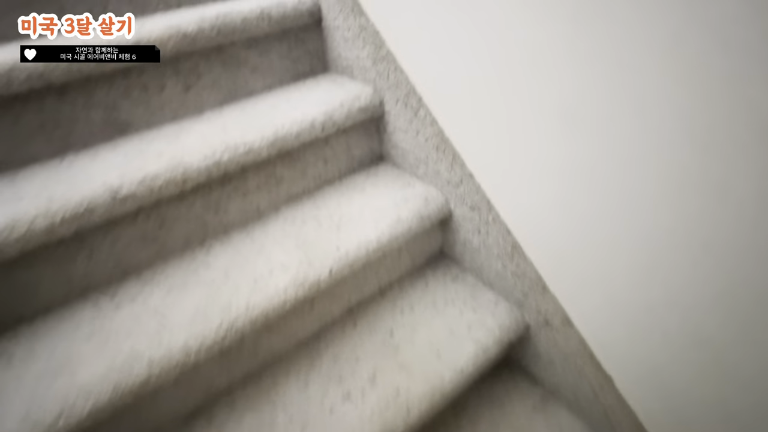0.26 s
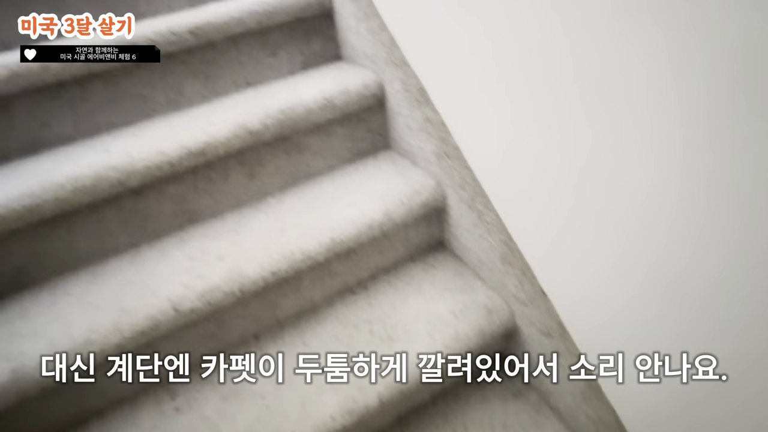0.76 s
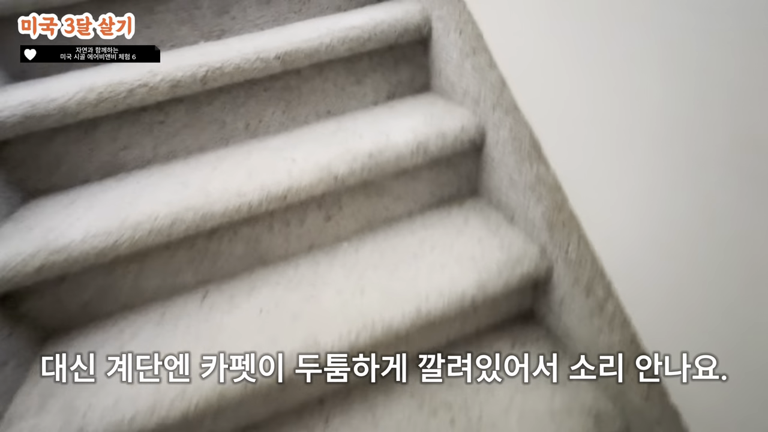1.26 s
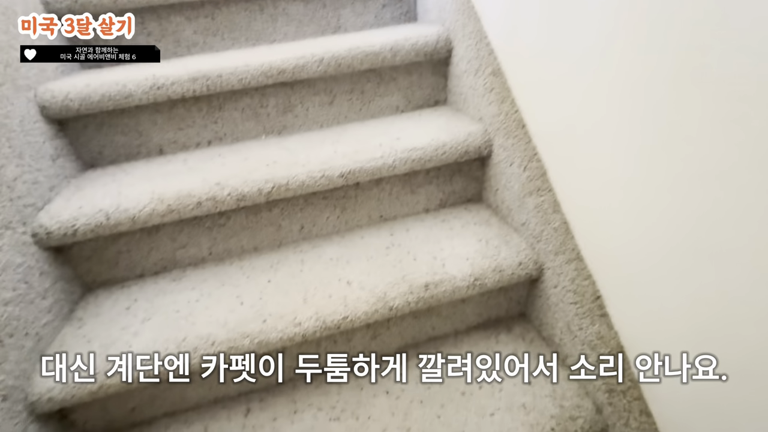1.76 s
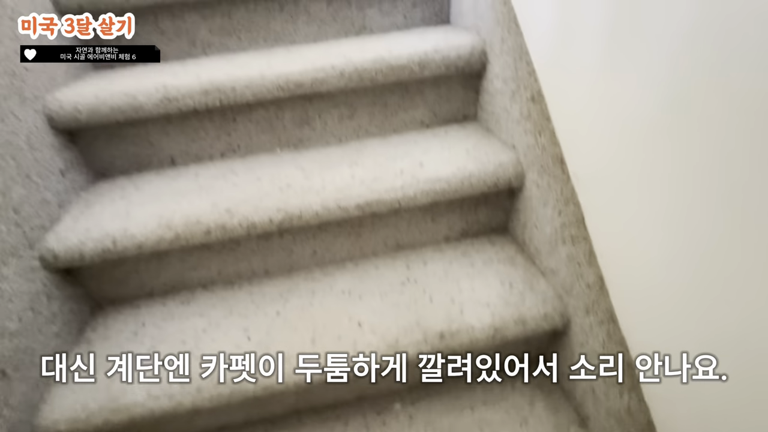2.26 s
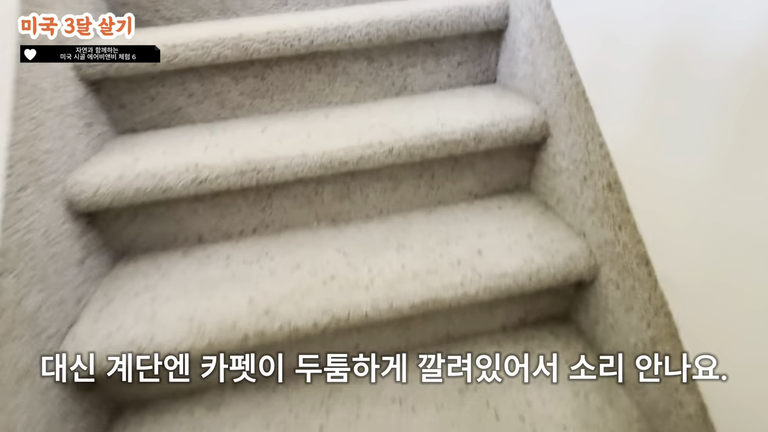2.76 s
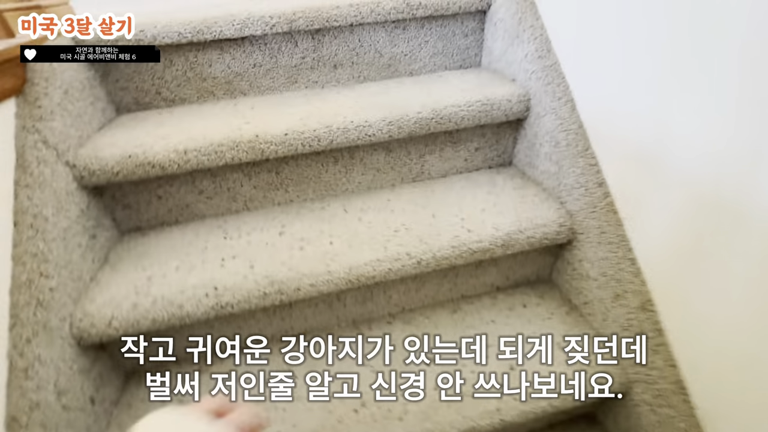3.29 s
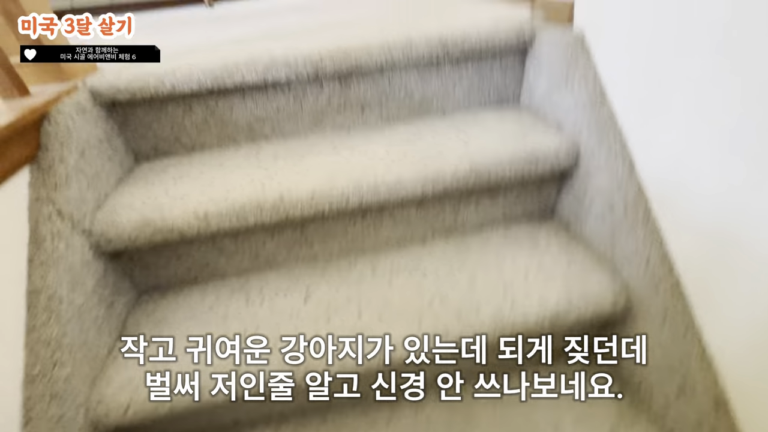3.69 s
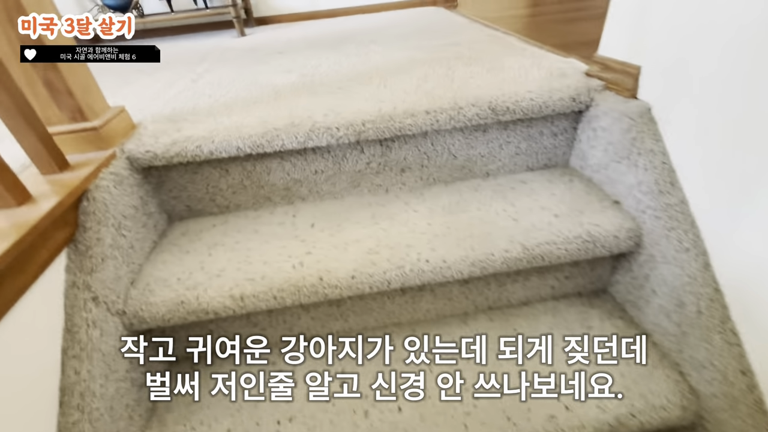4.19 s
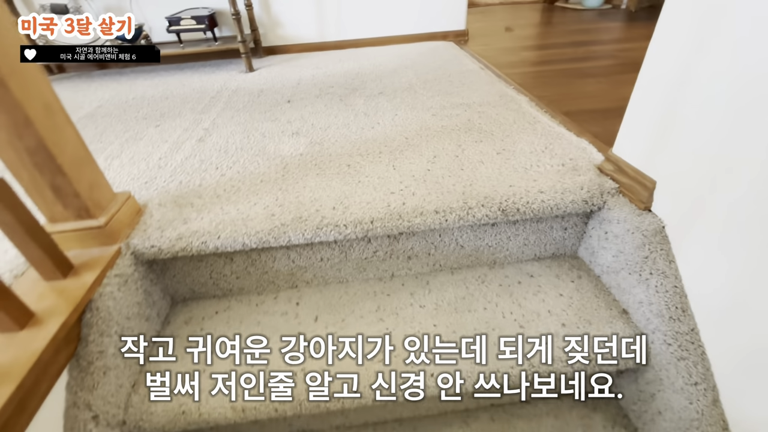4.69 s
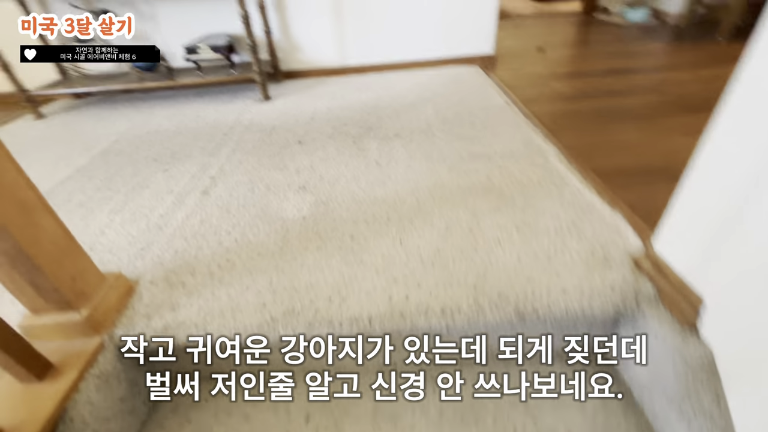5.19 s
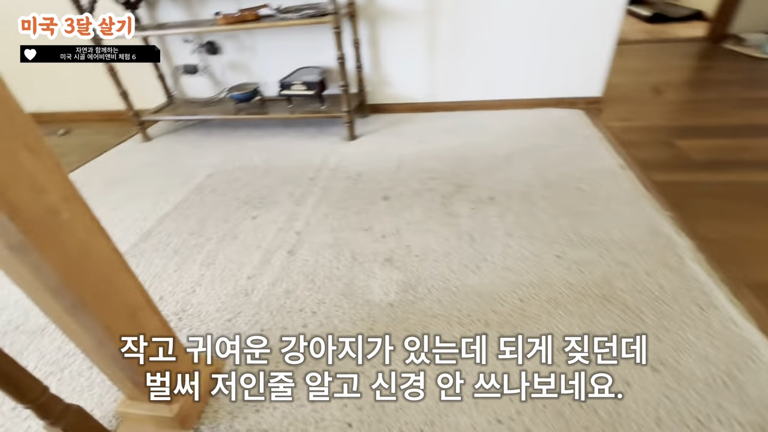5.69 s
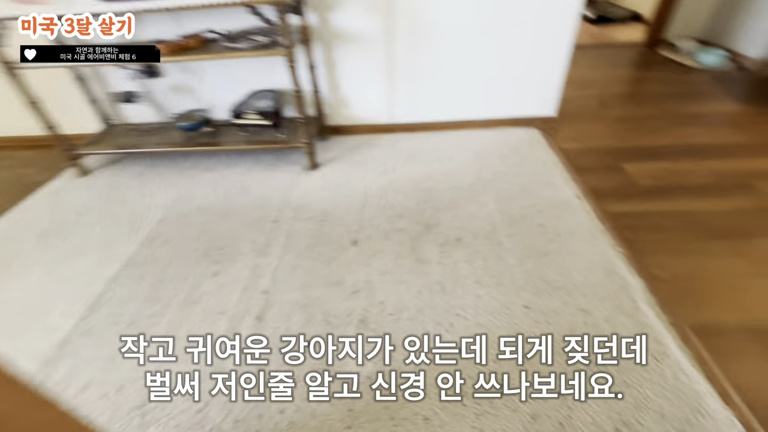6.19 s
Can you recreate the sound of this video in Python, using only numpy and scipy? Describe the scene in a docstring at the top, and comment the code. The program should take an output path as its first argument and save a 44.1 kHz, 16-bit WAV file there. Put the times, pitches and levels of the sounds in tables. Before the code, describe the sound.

Footsteps on deep carpet are heard close up from a hand-held microphone, in mono: dry scuffs, crisp little crunches, dull wooden knocks and soft low thumps, arriving in uneven clusters under a second apart. Behind them a vehicle engine, dulled by house walls, speeds up, changes gear after two seconds and holds a wavering low drone. Quiet outdoor rumble and faint hiss continue until a final crisp step.

```python
"""Indoors, on carpeted wooden stairs, with a hand-held microphone close to the climber's feet.
At first an engine outside speeds up and the climb begins: soles brush the pile as swelling grainy noise,
crunch it in bursts of noise, and knock, rub and thump the stairs as ringing modes and gliding noise.
After two seconds the engine changes gear and drones on, wavering sines dulled by the walls.
The steps go on to the end, over filtered noise from outdoors, faint house tones and hiss."""
import sys
import numpy as np
from scipy import signal
from scipy.fft import rfft, irfft
from scipy.io import wavfile
from scipy.ndimage import uniform_filter1d

SR = 44100
rng = np.random.default_rng(int(sys.argv[2]) if len(sys.argv) > 2 else 0)


def inscribe(sig):
    """Save sig as 16-bit PCM at rate SR to the path in sys.argv[1].

    A 1-D sig is mono; a 2-D sig holds one channel per row.
    Samples are clipped to [-1, 1] before scaling.
    """
    pcm = np.round(np.clip(np.atleast_2d(sig).T, -1, 1) * 32767)
    wavfile.write(sys.argv[1], SR, pcm.astype(np.int16))


N = 284445  # samples, about 6.45 s


# Colour of fibres slipping under a sole, close by: frequency_hz, relative density_db (per Hz)
PILE_COLOUR = [(300, 4), (1200, 10.5), (2000, 18.5), (4000, 10), (8000, 2), (11000, -5), (16000, -14)]


def brush():
    """Fibres slipping under the sole: grainy, patchy noise, blended from a dull and a bright colour."""
    grain_db = 2.0 * drift(N, 0.0054) + 1.04 * drift(N, 0.00047)
    # single tufts letting go, about 110 a second
    tufts = (rng.random(N) < 110 / SR) * np.minimum(rng.exponential(0.65, N), 1.8)
    crackles = signal.lfilter([1], [1, -np.exp(-1 / (0.00083 * SR))], tufts)
    grains = evened((gain_of(grain_db) + crackles) * rng.standard_normal(N))
    fibres = patchy(grains, 2.5, frames=20, bins=5)
    dull = coloured(fibres, PILE_COLOUR, tilt_db=-5)
    bright = coloured(fibres, PILE_COLOUR, tilt_db=5)
    dull_gain, bright_gain = strokes()
    return dull_gain * dull + bright_gain * bright


# Strokes of a sole over the pile:
# full_strength_s, level_db, rise_s, hold_s, tilt_db (per octave, sets the dull and bright shares)
SOLE_STROKES = [(0.283, -55, 0.046, 0.052, 3), (0.369, -40.5, 0.15, 0.0039, -1),
                (0.525, -50, 0.2, 0.0028, 6), (0.718, -51.5, 0.055, .003, -2),
                (0.96, -69, 0.27, 0.013, 4.5), (1.097, -44.5, 0.019, 0.022, -0.4),
                (1.163, -44.5, 0.1, 0.077, 0.7), (1.328, -41.5, 0.2, .003, 0),
                (1.456, -58.5, 0.055, .003, 0), (1.87, -53.5, .04, .04, 0.5),
                (1.915, -41.5, 0.014, 0.023, -1.5), (1.986, -49, 0.22, 0.024, 0.5),
                (2.125, -43, 0.19, .003, 0.7), (2.273, -56, 0.067, 0.0046, -2),
                (2.647, -44, 0.024, 0.047, -0.5), (2.753, -39, 0.14, .003, 0),
                (2.857, -41.5, 0.14, 0.003, -0.8), (3.405, -52.5, 0.027, 0.019, 2),
                (3.447, -42.5, 0.12, 0.015, -2.5), (3.505, -50, 0.14, 0.044, 1),
                (3.614, -43, 0.097, 0.0074, 0), (3.745, -58, 0.63, 0.052, -1.5),
                (3.894, -61.5, 0.034, .005, 0.5), (4.147, -49.5, 0.04, 0.018, 2),
                (4.184, -41.5, 0.07, 0.0025, 1.5), (4.26, -50.5, 0.28, 0.019, 0),
                (4.379, -43.5, 0.27, 0.0039, -0.5), (4.506, -50.5, 0.14, 0.0037, 0),
                (4.934, -53.5, 0.045, 0.025, 5), (4.961, -43.5, 0.066, .003, 0.1),
                (5.022, -50, 0.14, 0.046, 0), (5.131, -47, 0.14, 0.03, -0.1),
                (5.606, -48.5, 0.067, 0.019, 1.5), (5.63, -44.5, 0.053, 0.056, 0),
                (5.821, -48.5, 0.45, 0.0028, 0), (6.342, -58, 0.048, 0.12, 6),
                (6.449, -38.5, 0.022, 0.0026, -2)]
RISE_DB, FALL_DB_PER_S = 41.5, 210  # climb over one rise time; pace of every fade
CLOTHES_DB = -74.5  # faint constant rustle under the strokes


def strokes():
    """Pressure on the pile: each stroke climbs, holds and fades, split into a dull and a bright share."""
    t = np.arange(N) / SR
    power = np.full((2, N), gain_of(CLOTHES_DB) ** 2 / 4)
    for full_s, level_db, rise_s, hold_s, tilt_db in SOLE_STROKES:
        before_db = np.maximum(RISE_DB * (full_s - t) / max(rise_s, 0.005), 0)
        after_db = FALL_DB_PER_S * np.maximum(t - full_s - abs(hold_s), 0)
        bright = np.clip(0.5 + tilt_db / 10, 0, 1)
        shares = np.array([[1 - bright], [bright]])
        power += (shares * gain_of(level_db - before_db - after_db)) ** 2
    return np.sqrt(power)


# Colour of snapping pile, close by: frequency_hz, relative density_db (per Hz)
SNAP_COLOUR = [(500, -27.5), (1200, -10), (2200, 2.5), (4000, 2.5), (7000, 4.5), (11000, -7.5),
               (16000, -20)]
# Crunches underfoot: start_s (approximate), peak_db (approximate, rms at the crest), tilt_db (per octave)
PILE_CRUNCHES = [(0.2877, -47.5, -1), (0.338, -45.5, -10.5), (0.3576, -39, -6.5), (0.504, -48.5, -14),
                 (0.5443, -44.5, -1.5), (0.722, -48.5, 0), (0.970, -51, 10), (1.0969, -41.5, -9.5),
                 (1.107, -43, 0), (1.238, -47, 4), (1.293, -42.5, -3.5), (1.353, -46.5, 3),
                 (1.529, -50, 29.5), (1.9143, -36.5, -10), (1.9463, -38.5, -13), (2.087, -48.5, 11),
                 (2.132, -41.5, -0.5), (2.273, -52.5, -7.5), (2.608, -59, -2), (2.651, -35, -5),
                 (2.769, -44, 2.1), (2.8258, -40, -6.5), (2.958, -59, 3), (2.972, -54, -4),
                 (3.4298, -36, -10), (3.4506, -44.5, 6), (3.505, -44.5, 3), (3.604, -52, -4),
                 (3.628, -42, 11), (3.693, -46.5, -13), (3.717, -52, 15), (3.778, -47, -10.5),
                 (4.150, -47, -2.5), (4.3215, -37.5, -5.5), (4.395, -46.5, -6.5), (4.474, -52, 0),
                 (4.507, -46, -7), (5.027, -42.5, 1.5), (5.149, -41, 2), (5.6356, -37, -1.5),
                 (5.7548, -45, -5), (6.4415, -32.5, 5)]
CRUNCH_S, LONGER_DB = 0.00397, 0.28  # length scale of a -41 dB crunch; dB longer for each dB louder


def crunch(start_s, peak_db, tilt_db):
    """A few milliseconds of packed snaps, each burst with its own lumpy colour and a short tail."""
    t = np.arange(3000) / SR
    length_s = CRUNCH_S * gain_of(LONGER_DB * (peak_db + 41))
    u = 3 * t / length_s  # the burst crests at u = 1
    tail = 0.084 * gain_of(-60 * t / 0.4) * np.minimum(u, 1)
    burst = u * np.exp(1 - u) + tail
    lumpy = patchy(rng.standard_normal(len(t)), 2.57, frames=20, bins=4)
    snaps = coloured(burst * lumpy, SNAP_COLOUR, tilt_db)
    levelled = snaps * np.linalg.norm(burst) / np.linalg.norm(snaps)
    return start_s - CRUNCH_S / 4, gain_of(peak_db) * levelled


# Weight landing on the stair frame:
# start_s (approximate), peak_db (lower swing, rms at the crest), t60_s, pitch_hz
FRAME_THUMPS = [(0.375, -38.5, 0.34, 59.2), (1.165, -33.5, 0.24, 63.2), (1.974, -38.5, 0.36, 66),
                (2.7, -45, 0.27, 64), (2.859, -46, 0.33, 60), (3.499, -38, 0.28, 64),
                (4.243, -45, 0.22, 66.2), (5.68, -46, 0.28, 69)]
UPPER_MODE, UPPER_MODE_DB = 1.85, -11  # second swing of the frame: pitch ratio and level against the first


def thump(start_s, peak_db, t60_s, pitch_hz):
    """The stair frame swings up softly in two modes and dies; its pitch slides up a little."""
    t = np.arange(SR // 2) / SR
    swing = (1 - np.exp(-t / 0.0081)) ** 2 * gain_of(-60 * t / t60_s)
    turns = np.cumsum(pitch_hz * (1 - 0.043 * np.exp(-t / 0.027))) / SR
    lower = np.sin(2 * np.pi * turns)
    upper = gain_of(UPPER_MODE_DB) * np.sin(2 * np.pi * UPPER_MODE * turns)
    return start_s - 0.01, np.sqrt(2) * gain_of(peak_db) * swing / swing.max() * (lower + upper)


# Ringing modes of a wooden tread: pitch_hz (before a small random detune), t60_s
TREAD_MODES = [(230, 0.095), (370, 0.12), (450, 0.049), (580, 0.023), (740, 0.049), (850, 0.043),
               (1050, 0.015), (1190, 0.039), (1340, 0.027), (1600, 0.012), (1800, 0.015), (2100, 0.0076),
               (2550, 0.022)]
# Knocks on a tread: start_s (approximate), peak_db, spot_hz (near which this spot rings best)
TREAD_KNOCKS = [(0.36, -47, 385), (0.359, -55, 1760), (0.951, -51.5, 1180), (0.970, -49, 1190),
                (1.106, -45, 910), (1.166, -43, 556), (1.186, -38, 388), (1.293, -41, 1800),
                (1.913, -38, 650), (1.945, -38.5, 870), (2.362, -44.5, 526), (2.651, -40, 810),
                (2.865, -41.5, 450), (3.429, -34.5, 527), (3.44, -40.5, 367), (3.452, -38, 1800),
                (3.607, -49, 1550), (3.628, -46, 1145), (3.693, -47.5, 750), (4.492, -46, 360),
                (5.122, -44, 1050), (5.232, -40, 540), (5.633, -37, 714), (5.636, -41, 2000),
                (5.657, -32.5, 1360), (5.82, -50.5, 860)]


def knock(start_s, peak_db, spot_hz):
    """A padded blow rings the tread; modes near the spot's own pitch ring loudest."""
    t = np.arange(6000) / SR
    signs = rng.choice([-1, 1], len(TREAD_MODES))
    detunes = rng.uniform(0.96, 1.04, len(TREAD_MODES))
    modes = np.zeros(len(t))
    for (hz, t60_s), sign, detune in zip(TREAD_MODES, signs, detunes):
        away_db = 20 * abs(np.log2(hz / spot_hz))
        modes += sign * gain_of(-away_db - 60 * t / t60_s) * np.sin(2 * np.pi * hz * detune * t)
    ring = modes * (1 - np.exp(-t / 0.0021))  # the pile softens the attack
    return start_s - 0.001, gain_of(peak_db) * ring / abs(ring).max()


# Narrow breathy rubs of shoe or tread:
# start_s, length_s, level_db (rms before the swell), start_hz, end_hz, width_hz
BREATHY_RUBS = [(.962, 0.06, -59.5, 1237, 1128, 109), (2.275, 0.11, -68.5, 2115, 1930, 320),
                (3.775, 0.081, -65, 2230, 1920, 310), (4.496, 0.059, -59.5, 5260, 5190, 250),
                (5.225, .08, -65, 2200, 1880, 500), (5.664, 0.075, -52, 1333, 1163, 115)]


def rub(start_s, length_s, level_db, start_hz, end_hz, width_hz):
    """Noise in one gliding resonance, swelling and fading."""
    count = round(length_s * SR)
    pole = np.exp(-np.pi * width_hz / SR)
    wobble = signal.lfilter([1], [1, -pole], rng.standard_normal((2, count)))
    turn = np.exp(2j * np.pi * np.cumsum(np.linspace(start_hz, end_hz, count)) / SR)
    breath = ((wobble[0] + 1j * wobble[1]) * turn).real
    swell = np.sin(np.pi * np.linspace(0, 1, count) ** 0.4) ** 0.43
    return start_s, gain_of(level_db) * evened(breath) * swell


# Engine outside: time_s, cycle_rate_hz (before a slight waver),
# level_db (each order, before the walls and a waver), third_order_db (added to the third order)
ENGINE_COURSE = [(0, 46, -68.5, -2), (0.301, 47, -53, 0), (0.701, 49, -53, 3), (1.6, 54.5, -54.5, -5.5),
                 (2.051, 55.5, -48.5, 2), (2.5, 44.5, -54.5, -6), (3.2, 44, -55.5, -6),
                 (3.802, 44, -48.5, -10.5), (4.3, 44, -55, -4.5), (4.8, 44, -54, 6),
                 (5.299, 44, -54.5, 5.5), (5.798, 42.5, -53.5, -5.5), (6.45, 40.64, -55.5, 10.5)]
# Multiples of the cycle rate that are heard indoors
ORDERS_HEARD = (2, 3, 5, 6, 7, 8)
# What the house lets through: frequency_hz, passed_db
WALLS_PASS = [(80, -5), (100, 3), (112, -4.5), (125, -3), (134, -2), (150, -35), (200, -38), (220, -10),
              (245, -14), (265, -11.5), (300, -27.5), (335, -20), (352, -17.5), (375, -34)]


def engine():
    """Wavering low orders of the firing cycle, each as loud as the walls pass its present pitch."""
    time_s, *columns = np.transpose(ENGINE_COURSE)
    rate_hz, level_db, third_db = (np.interp(np.arange(N) / SR, time_s, c) for c in columns)
    turns = np.cumsum(rate_hz * (1 + 0.00384 * drift(N, 0.093))) / SR
    heard = np.zeros(N)
    for order in ORDERS_HEARD:
        order_db = level_db + read(WALLS_PASS, order * rate_hz) + third_db * (order == 3)
        order_db = order_db + 3.0 * drift(N, 0.08)
        heard += np.sqrt(2) * gain_of(order_db) * np.sin(2 * np.pi * (order * turns + rng.random()))
    return heard


# Outdoor noise through the walls: time_s, rumble_db, murmur_db (road), upper_db (upper part of the murmur)
OUTDOOR_LEVELS = [(0.0, -64.5, -60.5, -75), (0.25, -80, -62, -70.5), (0.8, -81, -59, -66.5),
                  (1.72, -55, -57.5, -69.5), (2.1, -50, -56.5, -65), (3.08, -57.5, -54, -64),
                  (3.25, -55, -55, -61.5), (3.65, -49, -53.5, -63.5), (4.13, -50.5, -57, -64),
                  (4.71, -48.5, -54, -64.5), (5.55, -53, -52, -63), (5.93, -54, -55.5, -65),
                  (6.45, -56, -54.5, -63)]
# Colours of those three layers, each: frequency_hz, relative density_db (per Hz)
RUMBLE_COLOUR = [(25, -42), (45, -9), (60, 9.5), (100, 10.5), (135, 9), (155, -20), (200, -66)]
MURMUR_COLOUR = [(100, 1.5), (180, -1.5), (250, -0.5), (350, -2.5), (500, -5.5), (650, -13), (1000, -47)]
UPPER_COLOUR = [(400, -21), (600, 1), (900, -2.5), (1500, -14), (3000, -36.5)]
SWELL_DB = 2.5  # depth of the uneven swells in the upper murmur
# Faint tones of the house: pitch_hz, level_db (amplitude, before a small waver)
HOUSE_HUM = [(122, -64), (242, -66.5), (587, -77)]


def background():
    """Rumble and wandering murmur from outdoors, faint hum tones and microphone hiss."""
    time_s, *columns = np.transpose(OUTDOOR_LEVELS)
    t = np.arange(N) / SR
    rumble_db, murmur_db, upper_db = (np.interp(t, time_s, c) for c in columns)
    rumble = gain_of(rumble_db) * shaped(RUMBLE_COLOUR)
    murmur = gain_of(murmur_db) * patchy(shaped(MURMUR_COLOUR), 2.2, frames=60, bins=2)
    upper = gain_of(upper_db) * patchy(shaped(UPPER_COLOUR), SWELL_DB, frames=70, bins=2)
    hum = sum(gain_of(db + 2.0 * drift(N, 0.02)) * np.sin(2 * np.pi * hz * t) for hz, db in HOUSE_HUM)
    return rumble + murmur + upper + hum + hiss()


# Colour of room and microphone hiss: frequency_hz, relative density_db (per Hz)
HISS_COLOUR = [(800, -7), (2000, 9.5), (4000, 8), (7000, 6), (10000, 1), (13000, -19), (16000, -23)]
HISS_DB = -79


def hiss():
    """Steady faint hiss of room and microphone, as filtered white noise."""
    return gain_of(HISS_DB) * coloured(rng.standard_normal(N), HISS_COLOUR)


def gain_of(db):
    """Decibels to a factor."""
    return 10 ** (np.asarray(db) / 20)


def evened(x):
    """Scales to rms 1."""
    return x / np.sqrt(np.mean(abs(x) ** 2) + 1e-20)


def read(points, hz):
    """Reads a spectrum on a log-frequency axis."""
    f, value = np.transpose(points)
    return np.interp(np.log(hz + 1), np.log(f + 1), value)


def add(mix, start_s, sound):
    """Mixes a sound in at its start time, cut at the end of the mix."""
    part = mix[round(start_s * SR):][:len(sound)]
    part += sound[:len(part)]


def drift(count, seconds):
    """Slow chance of rms 1: white noise averaged twice over the given time."""
    size = max(round(seconds * SR), 1)
    once = uniform_filter1d(rng.standard_normal(count), size)
    return evened(uniform_filter1d(once, size))


def coloured(x, points, tilt_db=0.):
    """Filters causally: the phase is the Hilbert transform of the log gain; the tilt turns about 4 kHz."""
    hz = abs(np.fft.fftfreq(2048, 1 / SR))
    octaves = np.log2(np.maximum(hz, 200) / 4000)
    log_gain = np.log(gain_of(read(points, hz) + tilt_db * octaves))
    response = np.exp(np.conj(signal.hilbert(log_gain)))
    taps = np.fft.ifft(response).real[:1024]
    return signal.oaconvolve(x, taps / np.linalg.norm(taps))[:len(x)]


def shaped(points):
    """Steady noise of rms 1 with the given spectrum."""
    gain = gain_of(read(points, np.fft.rfftfreq(N, 1 / SR)))
    return evened(irfft(rfft(rng.standard_normal(N)) * gain, N))


def patchy(x, depth_db, frames, bins):
    """Lifts and lowers random patches of time and frequency."""
    z = signal.stft(x, nperseg=256, noverlap=192)[2]
    field = uniform_filter1d(rng.standard_normal(z.shape), bins, 0)
    field = uniform_filter1d(field, frames, 1)
    gain = gain_of(depth_db * evened(field))
    return signal.istft(z * evened(gain), nperseg=256, noverlap=192)[1][:len(x)]


def scene():
    """Steps close by, over the engine and the background, on one channel."""
    steps = brush()
    contacts = ((PILE_CRUNCHES, crunch), (TREAD_KNOCKS, knock), (BREATHY_RUBS, rub), (FRAME_THUMPS, thump))
    for table, source in contacts:
        for row in table:
            add(steps, *source(*row))
    return (steps + engine() + background())[None]


def record(dry):
    """The microphone's low cut at 44 Hz, then the band limit at 15.7 kHz."""
    low_cut = signal.butter(5, 44, "high", fs=SR, output="sos")
    cut = signal.sosfilt(low_cut, dry)
    band_limit = signal.firwin(511, 15700, window=("kaiser", 9), fs=SR)
    return signal.oaconvolve(cut, band_limit[None], "same")


dry = scene()
out = record(dry)
inscribe(out)
```